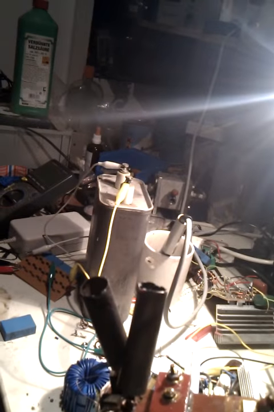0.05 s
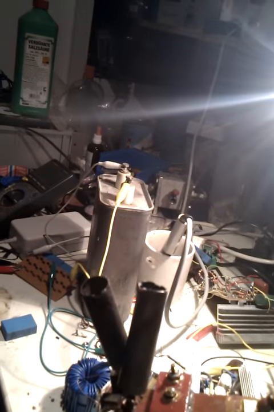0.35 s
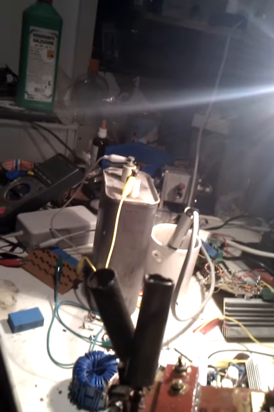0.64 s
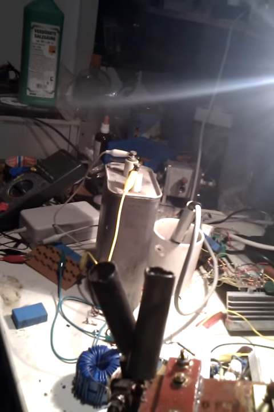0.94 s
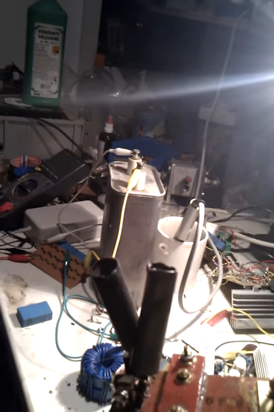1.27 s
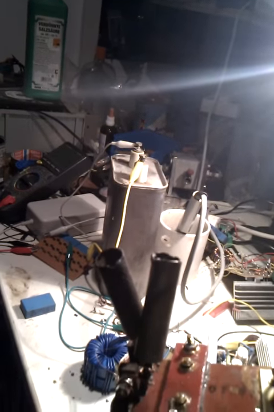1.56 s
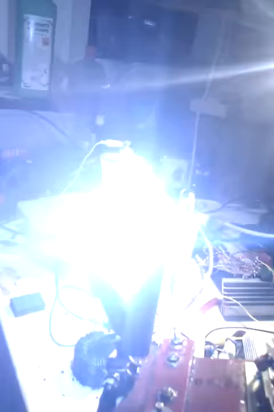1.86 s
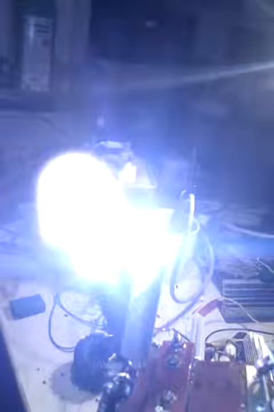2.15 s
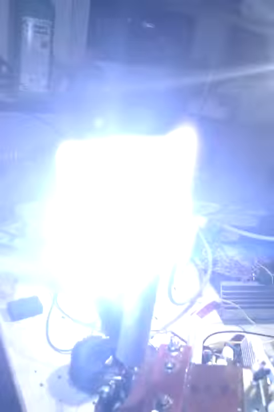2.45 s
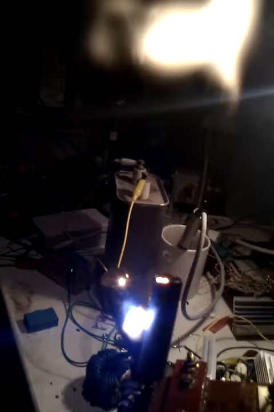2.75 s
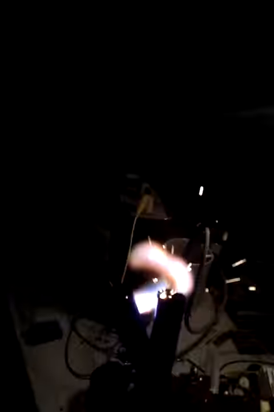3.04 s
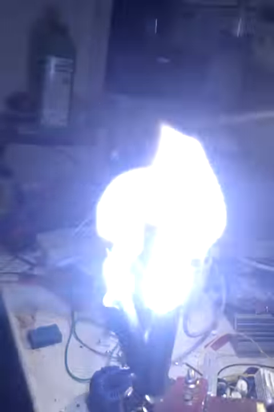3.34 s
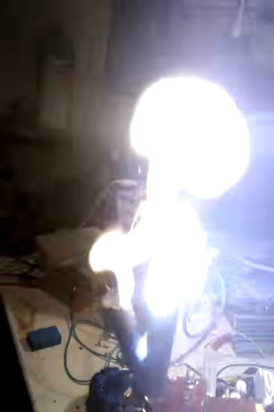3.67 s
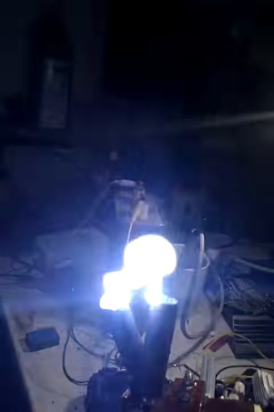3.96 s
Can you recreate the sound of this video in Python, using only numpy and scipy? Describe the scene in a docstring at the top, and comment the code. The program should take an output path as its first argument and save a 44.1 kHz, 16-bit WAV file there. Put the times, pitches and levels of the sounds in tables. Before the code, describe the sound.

An electric arc strikes, then hisses, crackles and pops harshly up close.

```python
"""Carbon arc on a workbench.

Two carbon rods on a mains transformer sizzle and squeal faintly, then strike an arc.
Runs of tiny discharges hiss, sputter and pop; some pops leave a short hollow ring.
The flame buzzes at twice the mains rate as it grows. Small room, heard close, through a limiter."""
import sys
import numpy as np
from scipy import signal
from scipy.fft import rfft, irfft
from scipy.io import wavfile
from scipy.ndimage import uniform_filter1d

SR = 44100
rng = np.random.default_rng(int(sys.argv[2]) if len(sys.argv) > 2 else 0)


def unload_audio(sound):
    """Save the sound as a 16-bit wav file, at the path given as the first command line argument."""
    columns = np.transpose(np.atleast_2d(sound))
    # keep every value between -1 and 1, then stretch to whole-number steps
    steps = np.round(np.clip(columns, -1, 1) * 32767)
    wavfile.write(sys.argv[1], SR, steps.astype(np.int16))


N = 176400
TIME = np.arange(N) / SR

# spectra: f/Hz, relative level/dB
AIR_SPECTRUM = [(40, -24), (100, -16), (150, -9), (300, -1), (500, 0), (700, -3.5), (1500, -8), (4800, -16),
                (6300, -8.5), (7100, -15), (7800, -33), (9000, -38.5)]
SIZZLE_SPECTRUM = [(100, -34), (300, -14.5), (700, -21.5), (1000, -19), (1270, -10), (1850, -17),
                   (2250, -7), (2650, -15), (3300, -12.5), (4700, -11), (5400, -4.5), (5700, -6), (6250, 5),
                   (6750, -8.5), (7100, -2.5), (7900, -39), (8700, -35)]
FLAME_SPECTRUM = [(50, -10), (150, 3), (400, -3), (850, 0.5), (1300, -2), (2100, -4.5), (4000, -5),
                  (7000, -10), (8000, -37.5)]
CRACK_SPECTRUM = [(100, -36.5), (500, -12.5), (1100, 3.5), (1700, -5.5), (3500, 0), (7000, 3.5),
                  (8000, -11.5), (9000, -21)]
THUMP_SPECTRUM = [(25, -7.5), (75, -3.5), (130, -2.5), (200, 0.5), (380, 2), (540, -5.5), (800, 4),
                  (1300, -4), (3000, -21.5), (9000, -53.5)]
HISS_SPECTRUM = [(40, -30.5), (150, -31), (450, -33.5), (1250, -22), (1600, -27), (2400, -18.5),
                 (4000, -18), (5100, -7), (5550, -5), (6200, 0), (6900, 0.5), (7200, -4), (7600, -19.5),
                 (8000, -28.5), (8900, -35.5)]
# harmonics: multiple, relative level/dB
SQUEAL_HARMONICS = [(1, -10), (2, -1.5), (3, -3)]
BUZZ_HARMONICS = [(1, -7), (2, 2), (3, -7), (4, -7.5), (5, -11.5), (6, -17), (7, -14), (8, -15)]
# envelopes: t/s, level/dB
SIZZLE_ENVELOPE = [(0.8, -70), (0.94, -55.5), (1.165, -59), (1.19, -49), (1.39, -47.5), (1.45, -42.5),
                   (1.624, -39), (1.641, -56.5), (1.825, -44.5)]
IGNITION_ENVELOPE = [(1.835, -42), (1.89, -44), (1.935, -46.5), (1.96, -41), (2.0, -39.5), (2.06, -62)]
BURN_ENVELOPE = [(1.835, -19), (1.865, -28), (1.915, -35), (1.96, -28), (2.0, -23.5), (2.09, -18),
                 (2.18, -18.5), (2.235, -28), (2.28, -19), (2.335, -23), (2.39, -14), (2.44, -20.5),
                 (2.53, -19.5), (2.575, -16), (2.65, -17), (2.72, -22), (2.815, -14.5), (2.87, -17),
                 (2.93, -21.5), (3.02, -18.5), (3.18, -23), (3.245, -16.5), (3.285, -21), (3.38, -19.5),
                 (3.44, -17), (3.58, -17), (3.63, -19), (3.70, -18.5), (3.80, -18), (3.85, -20),
                 (3.92, -16.5), (4.0, -20.5)]
# bench whine: f/Hz, level/dB
WHINE_TONES = [(536, -62.5)]
# metallic pings: t/s, level/dB
METAL_PINGS = [(.155, -65), (0.576, -63)]
# rod squeals: t/s, length/s, level/dB
ROD_SQUEALS = [(0.8, 0.25, -62), (0.98, 0.42, -61), (1.627, 0.31, -56.5)]
# contact ticks: t/s, relative level/dB
ROD_TICKS = [(0.719, -39.5), (1.4035, -28), (1.6128, -40)]
# buzz swells: crest t/s, level/dB, rise/(dB/s)
BUZZ_SWELLS = [(2.14, -49, 169), (2.401, -38, 179.5), (2.655, -46, 161.5), (2.849, -46, 166.5),
               (3.094, -41.5, 135), (3.306, -41, 154), (3.559, -46, 143), (3.788, -51.5, 149)]
# arc chokes, then catches: catch t/s, choke length/s, depth/dB
ARC_STALLS = [(1.949, 0.021, 12), (2.221, 0.016, 8), (2.244, 0.02, 25), (2.457, 0.011, 9),
              (2.505, 0.022, 8), (2.615, 0.021, 8.5), (2.693, 0.025, 13.5), (2.883, 0.028, 11.5),
              (2.945, 0.028, 5), (3.12, 0.013, 27), (3.348, 0.026, 13), (3.623, 0.031, 16),
              (3.649, 0.021, 14), (3.823, 0.02, 11.5), (3.863, 0.03, 18), (3.888, 0.013, 29),
              (3.902, 0.027, 10)]
# arc flares: t/s, length/s, lift/dB
ARC_FLARES = [(1.982, 0.01, 10.5), (2.458, 0.026, 7.5), (3.117, 0.019, 6.5), (3.299, 0.02, 8.5),
              (3.412, 0.015, 9)]
# hollow rings: t/s, f/Hz, relative level/dB
ARC_RINGS = [(1.834, 1194, -36), (1.956, 1190, -39.5), (2.44, 1280, -41.5), (2.512, 1290, -35.5),
             (2.714, 1310, -38.5), (3.126, 1275, -40), (3.309, 1215, -36)]
# pops: t/s, relative crack level/dB, relative thump level/dB
ARC_POPS = [(1.8332,-25.5,-43), (1.889,-26.5,-41), (2.0825,-25.5,-34), (2.122,-29.5,-34), (2.134,-21,-31.5),
            (2.216,-19.5,-36.5), (2.357,-27,-47), (2.375,-33,-42), (2.3838,-18.5,-29), (2.4056,-24,-37),
            (2.414,-18.5,-27.5), (2.4623,-30,-31.5), (2.473,-21,-37), (2.5018,-19,-32.5), (2.616,-27,-42.5),
            (2.657,-32,-30.5), (2.8232,-30.5,-51), (2.855,-29.5,-37), (2.884,-27.5,-37.5),
            (3.0767,-25.5,-28), (3.0865,-34,-27.5), (3.097,-22,-32.5), (3.1223,-21.5,-44),
            (3.1626,-23,-35.5), (3.1787,-15,-27), (3.184,-38,-30), (3.207,-25.5,-41), (3.2366,-23,-37),
            (3.305,-34,-28.5), (3.332,-23.5,-34), (3.357,-20.5,-40), (3.496,-22.5,-30), (3.575,-41,-29.5),
            (3.62,-22,-37.5), (3.7009,-32,-35), (3.7971,-25,-28), (3.8651,-29,-34.5), (3.881,-24,-37),
            (3.9561,-18.5,-29.5)]

STRIKE_S = ARC_POPS[0][0]
BUZZ_HZ, MAINS_CREST_S = 100, .0065


def amp(db):
    """Decibels to gain."""
    return 10 ** (np.asarray(db) / 20)


def unit(x):
    """Scale to rms 1."""
    return x / np.sqrt(np.mean(x ** 2) + 1e-20)


def add(mix, start_s, sound):
    """Mix a sound in, in place."""
    part = mix[max(round(start_s * SR), 0):][:len(sound)]
    part += sound[:len(part)]


def colour(x, spectrum, size=4096):
    """Minimum-phase filter of unit energy."""
    hz, db = np.transpose(spectrum)
    bins_hz = abs(np.fft.fftfreq(size, 1 / SR)) + 1
    log_gain = np.log(amp(np.interp(np.log(bins_hz), np.log(hz), db)))
    response = np.exp(np.conj(signal.hilbert(log_gain)))
    taps = np.fft.ifft(response).real[:size // 2]
    return signal.oaconvolve(x, taps / np.linalg.norm(taps))[:len(x)]


def wander(cutoff_hz):
    """Random drift, rms 1."""
    rolloff = 1 + (np.fft.rfftfreq(N, 1 / SR) / cutoff_hz) ** 4
    return unit(irfft(rfft(rng.standard_normal(N)) / rolloff, N))


def sparks(per_s, spread_db):
    """Random clicks of uneven size, rms 1."""
    size = amp(spread_db * np.minimum(rng.exponential(1, N), 4))
    return unit(size * rng.choice([-1, 1], N) * (rng.random(N) < per_s / SR))


def burst(decay_s, size=1024):
    """Decaying puff of noise."""
    return rng.choice([-1, 1], size) * np.exp(-TIME[:size] / decay_s)


def hollow(hz, stage_width_hz=176):
    """Noise through two like resonators, rms 1."""
    b, a = signal.iirpeak(hz, hz / stage_width_hz, SR)
    return unit(signal.lfilter(b, a, signal.lfilter(b, a, rng.standard_normal(N))))


def background(air_db=-61):
    """Room air and a faint, wavering bench whine."""
    whine = np.zeros(N)
    for hz, db in WHINE_TONES:
        level = amp(db + 2 * wander(16))
        cycles = np.cumsum(hz + 5 * wander(18.3)) / SR
        whine += level * np.sin(2 * np.pi * cycles)
    return amp(air_db) * unit(colour(rng.standard_normal(N), AIR_SPECTRUM)) + whine


def room(x, t60_s=.15, echoes_per_s=2500, gain_db=-10):
    """Sparse reflections from bench and walls."""
    t = TIME[:SR // 2]
    taps = rng.choice([-1, 1], len(t)) * (rng.random(len(t)) < echoes_per_s / SR)
    taps = taps * (t > .002) * amp(-60 * t / t60_s)
    return amp(gain_db) * signal.oaconvolve(x, taps / np.linalg.norm(taps))[:N]


def pings(hz=7432, t60_s=.75):
    """Thin metallic rings before the rods heat."""
    out = np.zeros(N)
    for s, db in METAL_PINGS:
        add(out, s, amp(db - 60 * TIME / t60_s) * np.sin(2 * np.pi * hz * TIME))
    return out


def squeals(hz=2085, waver=.0093):
    """The rods sing thinly in wavering spurts."""
    level = np.zeros(N)
    for s, length_s, db in ROD_SQUEALS:
        add(level, s, amp(db) * signal.windows.tukey(int(length_s * SR), .5))
    phase = 2 * np.pi * np.cumsum(hz * (1 + waver * wander(250))) / SR
    return level * sum(amp(db + 3.8 * wander(40)) * np.sin(k * phase) for k, db in SQUEAL_HARMONICS)


def contact(tick_gain_db=-9.5):
    """The touching rods sizzle and tick until the strike."""
    level_db = np.interp(TIME, *np.transpose(SIZZLE_ENVELOPE), left=-100) + .63 * wander(90)
    drive = amp(level_db) * (TIME < STRIKE_S) * sparks(per_s=2400, spread_db=3.2)
    for s, db in ROD_TICKS:
        add(drive, s, amp(db + tick_gain_db) * burst(decay_s=.0047))
    return colour(drive, SIZZLE_SPECTRUM)


def ignition():
    """The flame catches with a soft, dull crackle."""
    level = amp(np.interp(TIME, *np.transpose(IGNITION_ENVELOPE), left=-120, right=-120))
    return colour(level * sparks(per_s=1200, spread_db=4), FLAME_SPECTRUM)


def buzz(collapse_db_per_s=904):
    """The flame buzzes louder as it grows, then collapses."""
    level = np.zeros(N)
    for crest_s, db, rise_db_per_s in BUZZ_SWELLS:
        t = TIME - crest_s
        level += amp(db - np.maximum(-t * rise_db_per_s, t * collapse_db_per_s))
    cycles = BUZZ_HZ * (TIME - MAINS_CREST_S) + .0096 * wander(30)
    return level * np.sqrt(2) * sum(amp(db) * np.cos(2 * np.pi * k * cycles) for k, db in BUZZ_HARMONICS)


def burn(choke_exponent=.21, smooth_s=.0016):
    """Arc strength: a slow envelope, cut by stalls, lifted by flares."""
    change_db = np.zeros(N)
    for catch_s, length_s, depth_db in ARC_STALLS:
        choke = np.linspace(0, 1, int(length_s * SR)) ** choke_exponent
        add(change_db, catch_s - length_s, -depth_db * choke)
    for s, length_s, lift_db in ARC_FLARES:
        add(change_db, s, lift_db * signal.windows.tukey(int(length_s * SR), .5))
    change_db = uniform_filter1d(change_db, int(smooth_s * SR) + 1)
    return amp(np.interp(TIME, *np.transpose(BURN_ENVELOPE)) + change_db) * (TIME > STRIKE_S)


def rings(bed_hz=1308, bed_db=-36.5, rise_s=.00079, decay_s=.013, ring_gain_db=5.5):
    """The arc stirs a hollow resonance that at times rings out roughly."""
    out = burn() * amp(bed_db + 5.7 * wander(40)) * hollow(bed_hz)
    t = TIME[:SR // 10]
    envelope = (1 - np.exp(-t / rise_s)) ** 2 * np.exp(-t / decay_s)
    envelope /= envelope.max()
    rms = np.sqrt(np.mean(envelope ** 2))
    for s, hz, db in ARC_RINGS:
        add(out, s, amp(db + ring_gain_db) * rms * unit(envelope * hollow(hz)[:len(t)]))
    return out


def pops(crack_gain_db=7, thump_gain_db=22, snap_gain_db=10):
    """Each pop: a broad crack, a pressure pulse, a snap of hiss."""
    crack, thump, snap = np.zeros((3, N))
    for s, crack_db, thump_db in ARC_POPS:
        add(crack, s, amp(crack_db + crack_gain_db) * burst(decay_s=.00095))
        add(thump, s, amp([thump_db + thump_gain_db]))
        add(snap, s, amp(crack_db + snap_gain_db) * burst(decay_s=.0015))
    return colour(crack, CRACK_SPECTRUM) + colour(thump, THUMP_SPECTRUM) + colour(snap, HISS_SPECTRUM)


def shimmer(x, bands=9, depth_db=2, rate_hz=22.7):
    """The restless arc makes each treble band swell and fade on its own."""
    hz, spectrum = np.fft.rfftfreq(N, 1 / SR), rfft(x)
    centres_hz = np.linspace(3500, 7500, bands)
    out = np.zeros(N)
    for weights in np.eye(bands):
        band = irfft(spectrum * np.interp(hz, centres_hz, weights), N)
        out += band * unit(amp(depth_db * wander(rate_hz)))
    return out


def saturate(x, ceiling=.36, window_s=.0005):
    """Strong runs of hiss flatten against a ceiling."""
    envelope = np.sqrt(2 * abs(uniform_filter1d(x ** 2, int(window_s * SR))))
    return x / (1 + (envelope / ceiling) ** 4) ** (1 / 4)


def arc(mains_depth=.1, flicker_db=3.64, flicker_hz=181, hiss_gain_db=.5, crack_db=-20, thump_db=-33):
    """Dense tiny discharges hiss, flicker and pulse with the mains; larger ones spit."""
    level = burn() * (1 + mains_depth * np.cos(2 * np.pi * BUZZ_HZ * (TIME - MAINS_CREST_S)))
    flicker = unit(amp(flicker_db * np.minimum(wander(flicker_hz), .5)))
    discharges = shimmer(sparks(per_s=18000, spread_db=3.5))
    hiss = amp(hiss_gain_db) * colour(level * flicker * discharges, HISS_SPECTRUM)
    spits = level * sparks(per_s=160, spread_db=1.5)
    cracks = amp(crack_db) * colour(spits, CRACK_SPECTRUM)
    thumps = amp(thump_db) * colour(spits, THUMP_SPECTRUM)
    return saturate(hiss) + cracks + thumps


def scene():
    """Bench sources with reflections, plus dry buzz and background; mono."""
    bench = arc() + ignition() + pops() + rings() + contact() + squeals() + pings()
    return (bench + room(bench) + buzz() + background())[None]


def record(dry, limit_db=-7.5, half_window_s=.0024, ceiling=.8, dc_offset=-.0034, cutoff_hz=9150):
    """Fast limiter, soft clip, slight offset, low-pass."""
    window = signal.windows.hann(2 * int(half_window_s * SR) + 1)
    power = signal.oaconvolve(dry[0] ** 2, window / window.sum(), "same")
    over_db = np.maximum(10 * np.log10(abs(power) + 1e-12) - limit_db, 0)
    limited = dry * amp(-over_db)
    clipped = limited / (1 + (limited / ceiling) ** 6) ** (1 / 6)
    lowpass = signal.firwin(301, cutoff_hz, window=("kaiser", 9), fs=SR)
    return signal.oaconvolve(clipped + dc_offset, lowpass[None], "same")


dry = scene()
out = record(dry)
unload_audio(out)
```